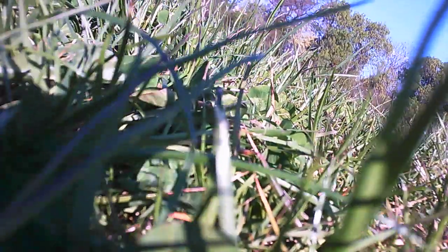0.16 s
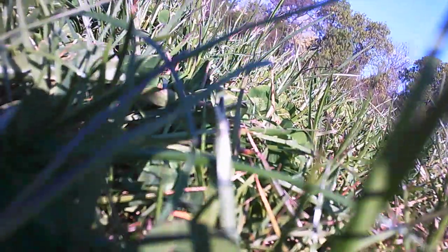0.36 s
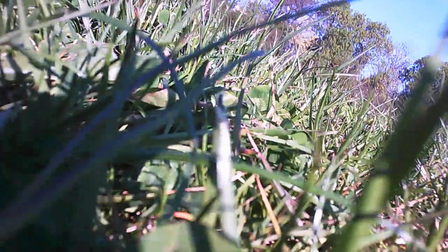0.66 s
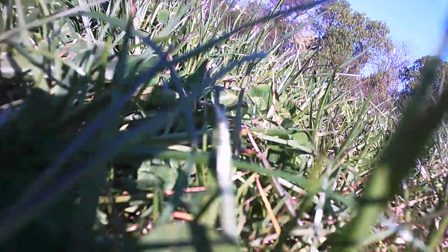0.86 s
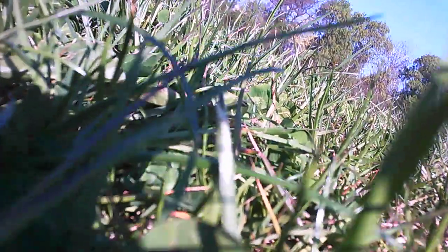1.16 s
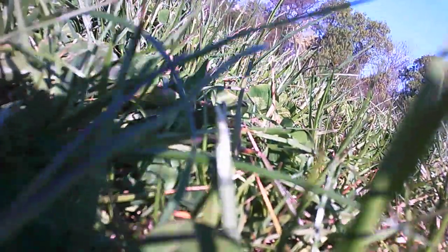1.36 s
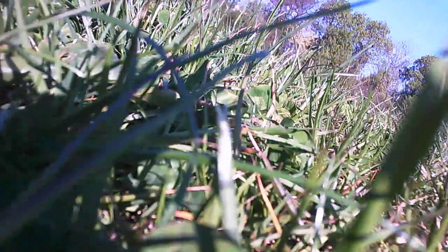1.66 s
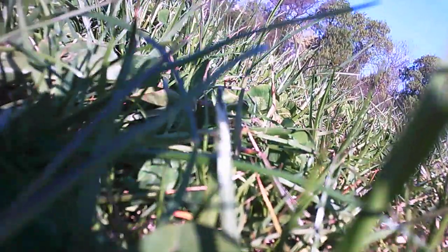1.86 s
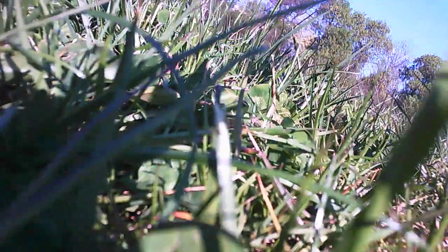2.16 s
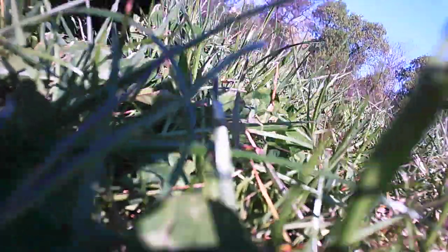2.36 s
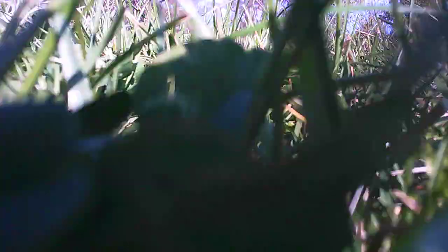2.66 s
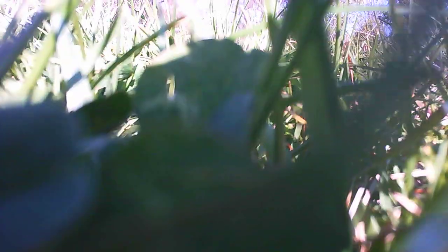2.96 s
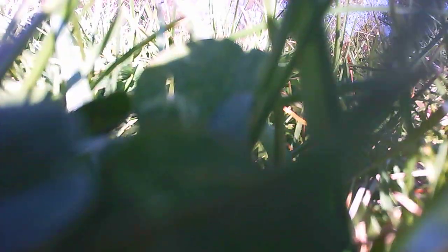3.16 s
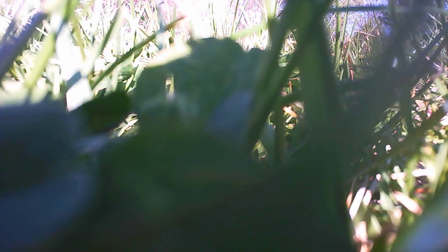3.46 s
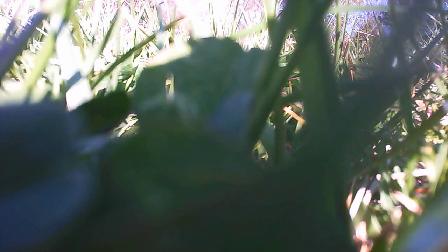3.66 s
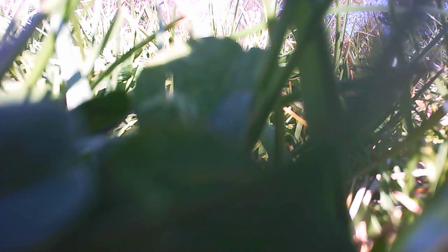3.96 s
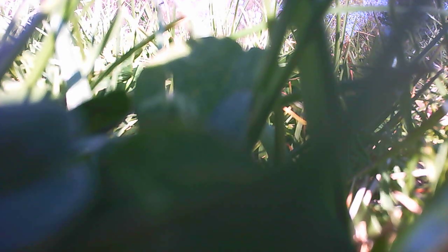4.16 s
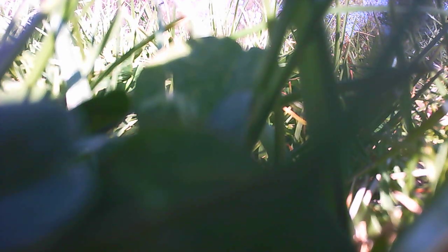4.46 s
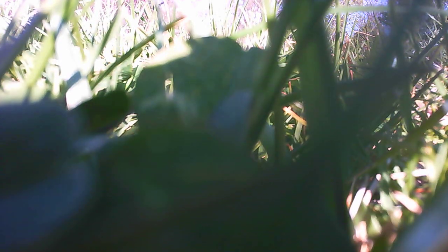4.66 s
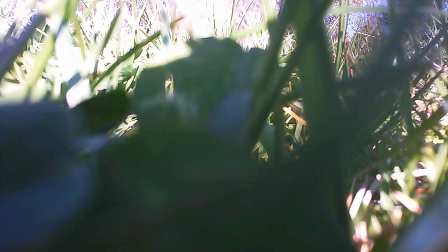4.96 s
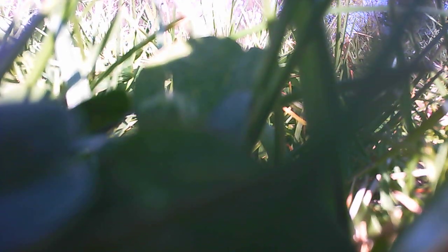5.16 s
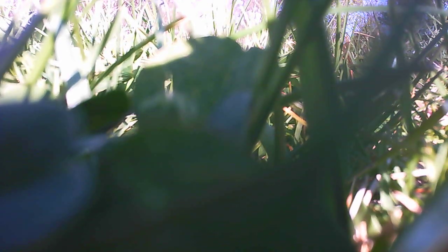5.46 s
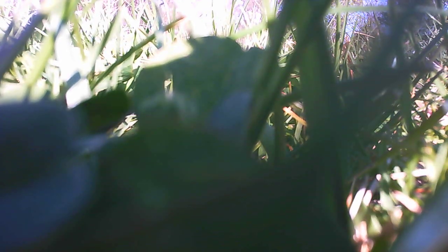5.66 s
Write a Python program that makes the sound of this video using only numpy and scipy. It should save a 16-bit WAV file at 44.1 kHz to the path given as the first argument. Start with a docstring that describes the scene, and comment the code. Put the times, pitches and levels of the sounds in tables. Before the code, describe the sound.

Close, distorted onboard sound: steady small-rotor drone, airy prop wash and a thin high whine, wavering slightly. A low thud ends the power, and a dense plastic rattle with brief singing gear chirps falls in speed and fades over two seconds, with thumps and ticks near the end. Afterward only low outdoor wind buffets the microphone over faint hiss, with one sharp gust bump and grass brush.

```python
"""Toy quadcopter winding down in grass

A small geared quadcopter runs its rotors; the microphone on its frame overloads. Rotor orders and gear
whine are sines locked to wheel turns, prop wash is throbbing noise. Power is cut with a jolt: random knocks
through body modes rattle the slack gears and teeth sing briefly as the rotors coast to rest. Thumps and
ticks are short rings, wind rumble is shaped noise, the jolt and later one hard gust add low pressure swings,
a brush of grass is noise strokes.
"""
import sys
import numpy as np
from scipy import signal
from scipy.fft import rfft, irfft
from scipy.io import wavfile
from scipy.ndimage import uniform_filter1d

SR = 44100
rng = np.random.default_rng(int(sys.argv[2]) if len(sys.argv) > 2 else 0)


def wav_record(signal):
    """Record a signal, one row per channel, as 16-bit PCM in the file named by sys.argv[1]."""
    frames = np.transpose(np.atleast_2d(signal))
    bounded = np.clip(frames, -1, 1)
    # unit amplitude maps onto the largest positive 16-bit level
    quanta = np.round(bounded * 32767).astype(np.int16)
    wavfile.write(sys.argv[1], SR, quanta)


N = 255780

# Driven gear speed: t/s, tooth rate f/Hz
TOOTH_RATE = [(0.0, 4455), (0.16, 4494), (0.21, 4452), (0.43, 4533), (0.62, 4492), (0.75, 4510),
              (0.82, 4488), (1.08, 4530), (1.16, 4524), (1.21, 4492), (1.37, 4500), (1.58, 4455),
              (1.64, 4425), (1.99, 4318), (2.07, 4320), (2.14, 4256), (2.22, 4292), (2.27, 4250)]
WHEEL_TEETH = 54
# Lead of the second rotor; it gains, runs in step, falls back: t/s, lead/turns
LEAD = [(0.0, .82), (.33, 1.16), (.6, 1.27), (.8, 1.56), (1.0, 1.67), (1.21, 1.84), (1.4, 1.97),
        (1.8, 1.99), (2.05, 1.94), (2.14, 1.83), (2.3, 1.46)]
POWER_CUT_S, COAST_S, FRICTION_TURNS_PER_S = 2.27, 1.15, 11  # coast: air drag time, dry friction
# Rotor orders: multiple of wheel turn rate, level/dB
ROTOR_ORDERS = [(1, -25), (2, -21.5), (3, -12), (4, -18), (5, -27), (6, -26), (9, -35)]
SECOND_ROTOR_DB, SECOND_WHINE_DB = -5, -17  # re first
SLACK_WHINE_DB = 18  # added to the second whine at full slack
# Whine side lines: multiple of wheel turn rate, level re whine/dB
GEAR_ORDERS = [(18, -13.5), (24, -19), (48, -20.5), (51, -22), (52, -18.5)]
# Blurred whine lines: multiple of wheel turn rate, level re whine/dB
BLURRED_ORDERS = [(60, -17.5), (105, -17), (111, -19.5)]
WHINE_DB, GEAR_GAIN_DB, RIPPLE_DB = -23, 5.5, -38  # gear gain excludes ripple
# Gear slack: t/s, share (0-1)
SLACK = [(1.8, 0.12), (2.1, 0.33), (2.26, 0.3), (2.33, 0.89)]
# Knocking of arms, shell, housing, thin shell, upper arm modes (one row each):
# level under load/dB, level slack at full speed/dB, slope/(dB per dB of speed)
KNOCKING = [(-11, 3, 2.5), (-22, -6, 1.64), (-33, -15, 1.94), (-28, -19.5, 2.5), (-35, -15.5, 0.93)]
# Bending arms: f/Hz, width/Hz, relative level/dB
ARM_MODES = [(128, 86, -10), (280.5, 18.3, 7), (228, 55, -12.5), (315.3, 38, -6), (380, 136, -7.5),
             (627, 165, -15.5)]
# Plastic shell: f/Hz, width/Hz, relative level/dB
SHELL_MODES = [(840, 340, -11.5), (1162, 208, 8), (1495, 316, 3.5), (1783, 225, 8), (2153, 143, 0)]
# Gear housing: f/Hz, width/Hz, relative level/dB
HOUSING_MODES = [(2727, 340, -4), (2845, 166, 0)]
# Thin shell: f/Hz, width/Hz, relative level/dB
THIN_SHELL_MODES = [(3560, 290, -3.5), (3880, 480, -3), (4520, 360, -2.5)]
KNOCKS_PER_S, SHELL_TOP_HZ, SLACK_LURCH_DB = 2400, 4900, 4
FIRST_STOP_S, FIRST_STOP_DB = 3.9, -4.5  # one rotor stops before the other
STOP_S, STOP_FADE_S = 4.26, 0.11  # fade ends at STOP_S
# Coasting teeth that bite and sing: t/s, level/dB, multiple of wheel turn rate
BITES = [(2.3538, -6, 18), (2.4039, -14, 20.4), (2.4773, -4.5, 18), (2.5485, -1.5, 18), (2.671, -9, 31.3),
         (2.7207, -15, 36), (2.7843, -8, 36), (2.9342, -8.5, 30), (2.9657, -15, 54), (3.024, -8.5, 54),
         (3.1131, -17, 54), (3.146, -17, 54), (3.205, -15.5, 54), (3.2778, -16.5, 54), (3.352, -13, 54),
         (3.4097, -18, 54), (3.4402, -15, 54)]
BITE_S = 0.0066
# Prop wash spectrum: f/Hz, relative density/dB
PROP_WASH = [(300, -13), (700, -0.5), (1500, 2), (2500, -5), (4000, -13.5), (6000, -15.5), (9000, -17.5),
             (12000, -15.5)]
PROP_WASH_DB, WASH_FADE_S = -18.5, 0.14
# Dull frame thumps at the cut and as the slowing wheel catches: t/s, level/dB, f/Hz
THUMPS = [(2.25, -9.5, 140), (2.3, -6, 130), (3.545, -17, 309), (3.675, -15, 384.4), (3.765, -19.5, 318),
          (3.85, -16, 270), (3.945, -23, 400), (4.09, -22, 301)]
THUMP_S = .012
# Shell ticks: t/s, level/dB, f/Hz
TICKS = [(3.556, -9.5, 1120), (3.6157, -2, 1176), (4.094, -23.5, 1410), (4.589, -26, 1500),
         (4.72, -18, 1290), (4.752, -6.5, 330), (4.815, -29, 1500)]
TICK_T60_S = 0.019
# Low rumble: wind, with a jolt of the craft just after the power cut: t/s, level/dB
RUMBLE = [(0.0, -21), (2.1, -21), (2.32, -3), (2.47, -16.5), (3.1, -14.5), (3.3, -12), (3.8, -13.5),
          (4.2, -14), (4.8, -14), (5.8, -15.5)]
# Rumble spectrum: f/Hz, relative density/dB
RUMBLE_COLOUR = [(8, -4), (16, 2.5), (30, -5), (45, -6.5), (75, -8), (105, -11.5), (135, -22), (190, -22),
                 (330, -30.5), (600, -37.5), (1000, -43), (1250, -47), (2150, -57.5), (3000, -63.5),
                 (6000, -77), (9000, -100)]
# Low pressure swings: a jolt at the power cut, then one hard gust: t/s, signed height, length/s
PRESSURE_SWINGS = [(2.303, .8, .010), (2.312, -.8, .008), (4.683, .35, .022), (4.711, -1.0, .032),
                   (4.738, 1.15, .022), (4.752, .35, .01)]
SWELL_TOP = 2.4  # saturation, in units of the whole rumble noise's rms
# Grass strokes on the shell: t/s, level/dB, length/s
BRUSH = [(4.689, -29.5, 0.0082), (4.716, -11.5, 0.01), (4.751, -26.5, 0.093)]
# Grass spectrum: f/Hz, relative density/dB
BRUSH_COLOUR = [(150, 10.5), (400, 11), (1000, 3.5), (2000, -0.5), (2600, -34.5), (4500, -30), (7000, -43)]
BRUSH_RISE_DB_PER_S, BRUSH_SAG_DB_PER_S, BRUSH_FALL_DB_PER_S = 1500, 90, 1200
# Thin electronic tones: f/Hz, level/dB
HUM = [(1023, -53.5), (2051, -61.5), (3074, -68.5)]
HISS_DB = -61
DRIVE_DB, OFFSET, CLIP_LEVEL, CLIP_KNEE = -0.5, -0.0019, .71, 8
SMOOTH_HZ, SAMPLER_HZ, CUTOFF_HZ = 4380, 10700, 12365


def from_db(db):
    """Gain of a level in dB."""
    return 10 ** (np.asarray(db) / 20)


def rms_one(x):
    """Scale to rms 1."""
    return x / np.sqrt(np.mean(x ** 2) + 1e-20)


def in_time(rows):
    """Interpolate each column of a curve to one value per sample."""
    s, *columns = np.transpose(rows)
    return [np.interp(np.arange(N) / SR, s, c) for c in columns]


def lowpass(x, order, cutoff_hz):
    """Butterworth low-pass."""
    return signal.sosfilt(signal.butter(order, cutoff_hz, fs=SR, output="sos"), x)


def drift(rate_hz):
    """Slow random wander of spread 1, about rate_hz times a second."""
    r = np.exp(-40 * np.pi * rate_hz / SR)  # runs at SR / 20
    noise = rng.standard_normal(N // 20 + 2002)
    slow = signal.lfilter([1], [1, -2 * r, r * r], noise)[2000:]
    return np.interp(np.arange(N) / 20, np.arange(len(slow)), rms_one(slow))


def coloured(x, spectrum):
    """Shape x by a spectrum, interpolated in log frequency; rms 1."""
    hz = np.maximum(np.arange(N // 2 + 1) * SR / N, 1)
    points = np.array(spectrum)
    level_db = np.interp(np.log(hz), np.log(points[:, 0]), points[:, 1])
    return rms_one(irfft(rfft(x) * from_db(level_db), N))


def resonate(x, modes):
    """Parallel resonances of alternating sign, each fed a slowly varying share; rms 1."""
    out = 0
    for k, (hz, width_hz, db) in enumerate(modes):
        r = np.exp(-np.pi * width_hz / SR)
        fed = x * from_db(db + 0.65 * drift(52))
        zeros = [(1 - r * r) / 2, 0, (r * r - 1) / 2]
        poles = [1, -2 * r * np.cos(2 * np.pi * hz / SR), r * r]
        out = out + (-1) ** k * signal.lfilter(zeros, poles, fed)
    return rms_one(out)


def tone(turns, db, waver_db, wander_rad, lead_turns=0, second_db=-99):
    """Sine on a running phase, wavering in level and phase; a second may run ahead of it."""
    phase = 2 * np.pi * turns + wander_rad * drift(12) + rng.uniform(0, 2 * np.pi)
    pair = np.sin(phase) + from_db(second_db) * np.sin(phase + 2 * np.pi * lead_turns)
    return np.sqrt(2) * from_db(db + waver_db * drift(4.4)) * pair


def wheel_speed():
    """Geared rotor speed in turns/s: driven, then slowed by air drag and dry friction."""
    driven = in_time(TOOTH_RATE)[0] / WHEEL_TEETH
    coasted_s = np.maximum(np.arange(N) / SR - POWER_CUT_S, 0)
    coasting = (driven + FRICTION_TURNS_PER_S) * np.exp(-coasted_s / COAST_S) - FRICTION_TURNS_PER_S
    return np.maximum(coasting, 1)


def second_lead():
    """Lead of the second rotor in turns, rounded by its inertia."""
    return uniform_filter1d(in_time(LEAD)[0], size=SR // 16)


def power_on(fade_s):
    """1 while the motors pull, exponential decay after the cut."""
    return np.exp(-np.maximum(np.arange(N) / SR - POWER_CUT_S, 0) / fade_s)


def rotors(turns):
    """Unbalance and blade orders of two rotors, beating as one slides past the other."""
    lead = second_lead()
    orders = sum(tone(k * turns, db, 1.5, 0.12, k * lead, SECOND_ROTOR_DB) for k, db in ROTOR_ORDERS)
    return power_on(0.0088) * orders


def gears(turns):
    """Tooth-mesh whine of both trains with side lines; stops dead when load leaves the teeth."""
    flutter = .11 * drift(45)
    second_db = SECOND_WHINE_DB + SLACK_WHINE_DB * in_time(SLACK)[0]
    whine = tone(WHEEL_TEETH * turns + flutter, WHINE_DB, 0.69, 0.36,
                 WHEEL_TEETH * second_lead(), second_db)
    sides = sum(tone(k * turns, WHINE_DB + rel_db, 3.5, 0.75) for k, rel_db in GEAR_ORDERS)
    blurred = sum(tone(k * turns + 0.36 * drift(82), WHINE_DB + rel_db, 0.5, 4.5)
                  for k, rel_db in BLURRED_ORDERS)
    # pinion ripple
    ripple = resonate(np.sin(2 * np.pi * 36 * turns), [(2830, 110, 0)])
    return power_on(0.008) * (from_db(GEAR_GAIN_DB) * (whine + sides + blurred) + from_db(RIPPLE_DB) * ripple)


def rattle(speed, turns):
    """Dense uneven knocks, bunched by the turning wheel, ring arms, shell and gear housing."""
    t = np.arange(N) / SR
    slack = np.clip(in_time(SLACK)[0], 0, 1)
    speed_db = 20 * np.log10(speed / speed[0])
    arms_db, shell_db, housing_db, thin_db, upper_arms_db = [
        loaded_db + slack * (slack_db + slope * speed_db - loaded_db)
        for loaded_db, slack_db, slope in KNOCKING]

    bunching_db = 0.53 * np.sin(np.pi * turns) + 1.73 * np.sin(6 * np.pi * turns) + 1.5 * drift(100)
    size_db = bunching_db + 1.9 * np.minimum(rng.exponential(1, N), 4)
    sizes = from_db(size_db) * rng.choice([-1, 1], N)
    knocks = (rng.random(N) < KNOCKS_PER_S / SR) * sizes + 1e-18

    running = np.clip((STOP_S - t) / STOP_FADE_S, 0, 1)
    one_left = from_db(FIRST_STOP_DB * (t > FIRST_STOP_S))
    shell = from_db(shell_db) * resonate(knocks, SHELL_MODES)
    # undo one_left here: the housing whirs on with the last rotor
    housing = from_db(housing_db) / one_left * resonate(knocks, HOUSING_MODES)
    thin_shell = from_db(thin_db) * resonate(knocks, THIN_SHELL_MODES)
    # soft plastic passes little treble
    dull = lowpass(shell + housing + thin_shell, 8, SHELL_TOP_HZ)

    # slack arms boom in fits
    lurching = knocks * from_db(SLACK_LURCH_DB * slack * drift(25))
    arms = from_db(arms_db) * resonate(lurching, ARM_MODES)
    upper_arms = from_db(upper_arms_db) * lowpass(resonate(lurching, ARM_MODES[3:]), 2, 800)
    return running * one_left * (arms + upper_arms + dull)


def bites(turns):
    """Short sung notes of biting teeth: rise fast, sag in pitch with the slowing wheel, die."""
    out, t = np.zeros(N), np.arange(int(.08 * SR)) / SR
    shape = t / BITE_S * np.exp(1 - t / BITE_S) * np.exp(-(t / (3 * BITE_S)) ** 2)
    for s, db, multiple in BITES:
        at = round(s * SR)
        turned = turns[at:at + len(t)] - turns[at]
        out[at:at + len(t)] += from_db(db) * shape * np.sin(2 * np.pi * multiple * turned)
    return out * from_db(2.5 * drift(120))


def prop_wash(turns):
    """Turbulent air off the blades, throbbing at the blade rate."""
    throb = 1 + 0.36 * np.sin(4 * np.pi * turns) + 0.096 * np.sin(2 * np.pi * turns)
    level = from_db(PROP_WASH_DB + 1.5 * drift(60))
    return power_on(WASH_FADE_S) * level * throb * coloured(rng.standard_normal(N), PROP_WASH)


def thumps():
    """Frame thumps: each a soft swell of a low ring."""
    out, t = np.zeros(N), np.arange(int(.1 * SR)) / SR
    swell = t / THUMP_S * np.exp(1 - t / THUMP_S)
    for s, db, hz in THUMPS:
        at = round(s * SR)
        out[at:at + len(t)] += from_db(db) * swell * np.sin(2 * np.pi * hz * t)
    return out


def ticks():
    """Short rings of the plastic shell, each with a quicker upper mode."""
    out, t = np.zeros(N), np.arange(int(.06 * SR)) / SR
    onset = 1 - np.exp(-t / .0005)
    for s, db, hz in TICKS:
        upper = .8 * np.sin(2 * np.pi * 1.45 * hz * t) * np.exp(-t / .002)
        ring = np.sin(2 * np.pi * hz * t) + upper
        at = round(s * SR)
        out[at:at + len(t)] += from_db(db - 60 * t / TICK_T60_S) * onset * ring
    return out


def wind_and_jolt():
    """Lumpy rumble of saturating deep swell and faster upper hiss, plus swings of the jolt and gust."""
    t = np.arange(N) / SR
    rumble = coloured(rng.standard_normal(N), RUMBLE_COLOUR)
    swell = signal.sosfiltfilt(signal.butter(2, 150, fs=SR, output="sos"), rumble)
    lumps = SWELL_TOP * np.tanh(swell * from_db(0.5 * drift(8)) / SWELL_TOP)
    hiss = (rumble - swell) * from_db(2.4 * drift(52))
    swings = sum(height * np.exp(-(2.5 * (t - s) / length_s) ** 2)
                 for s, height, length_s in PRESSURE_SWINGS)
    # deep lumps yield while the hard gust passes
    calm = 1 - .7 * np.exp(-((t - PRESSURE_SWINGS[3][0] - .015) / .04) ** 2)
    return from_db(in_time(RUMBLE)[0]) * (calm * lumps + hiss) + swings


def brush():
    """Dense tiny scratches of grass blades; each stroke rises, sags slowly and falls."""
    t = np.arange(N) / SR
    strokes = 0
    for s, db, length_s in BRUSH:
        rise_db = BRUSH_RISE_DB_PER_S * np.maximum(s - t, 0)
        sag_db = BRUSH_SAG_DB_PER_S * np.maximum(t - s, 0)
        fall_db = BRUSH_FALL_DB_PER_S * np.maximum(t - s - length_s, 0)
        strokes = strokes + from_db(db - rise_db - sag_db - fall_db)
    scratches = rng.standard_normal(N) * from_db(3.8 * drift(154))
    return strokes * coloured(scratches, BRUSH_COLOUR)


def electronics():
    """Amplifier hiss (white noise) and faint tones."""
    t = np.arange(N) / SR
    hiss = from_db(HISS_DB) * rng.standard_normal(N)
    return hiss + sum(tone(hz * t, db, waver_db=0.5, wander_rad=2.5) for hz, db in HUM)


def scene():
    """Sum of all sources at the microphone."""
    speed = wheel_speed()
    turns = np.cumsum(speed) / SR
    craft = rotors(turns) + gears(turns) + rattle(speed, turns) + bites(turns) + prop_wash(turns)
    return (craft + thumps() + ticks() + wind_and_jolt() + brush() + electronics())[None]


def record(dry):
    """Amplifier clips with a short knee; a gentle filter rounds corners; the converter cuts the top."""
    drive = (from_db(DRIVE_DB) * dry + OFFSET) / CLIP_LEVEL
    clipped = CLIP_LEVEL * drive / (1 + drive ** CLIP_KNEE) ** (1 / CLIP_KNEE)
    keep = np.exp(-2 * np.pi * SMOOTH_HZ / SR)
    rounded = signal.lfilter([1 - keep], [1, -keep], clipped)
    sampled = lowpass(rounded, 6, SAMPLER_HZ)
    return signal.sosfilt(signal.cheby2(6, 24, CUTOFF_HZ, fs=SR, output="sos"), sampled)


dry = scene()
out = record(dry)
wav_record(out)
```